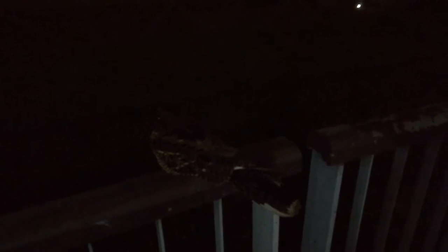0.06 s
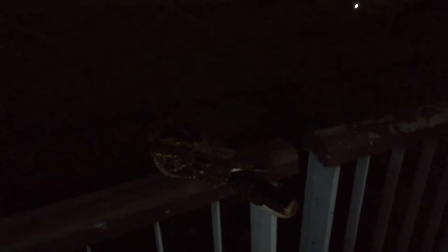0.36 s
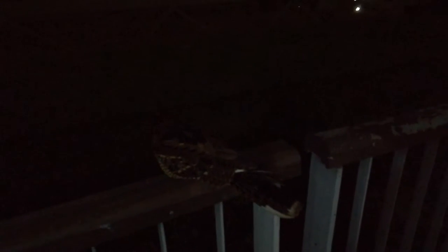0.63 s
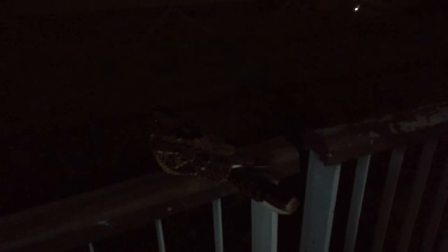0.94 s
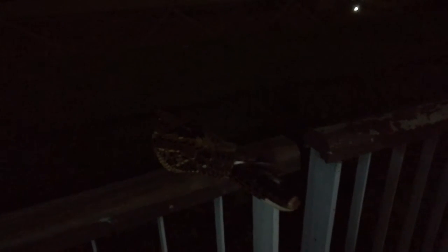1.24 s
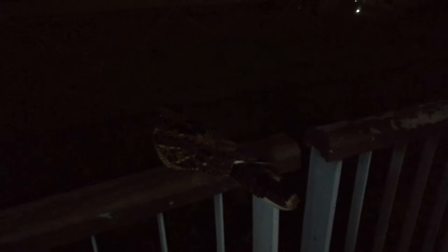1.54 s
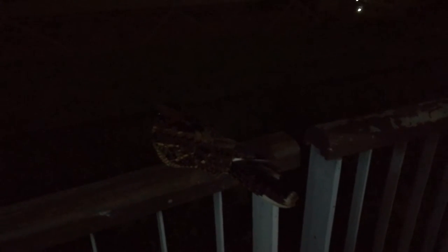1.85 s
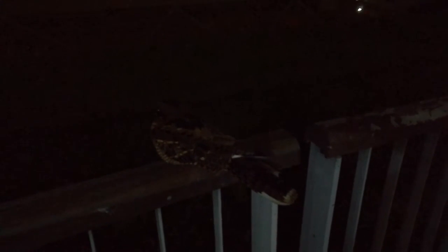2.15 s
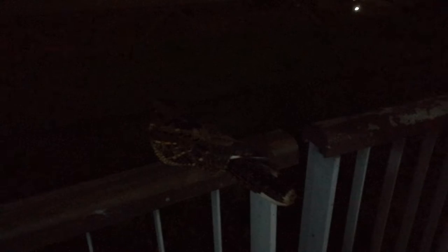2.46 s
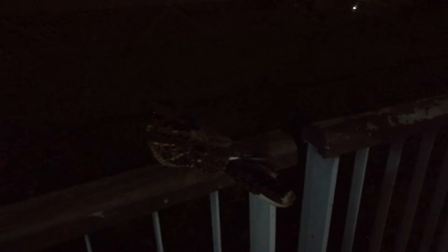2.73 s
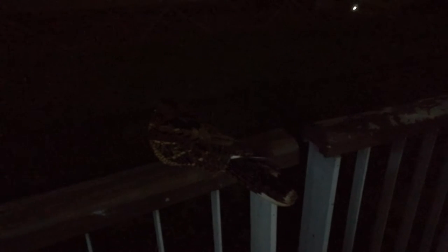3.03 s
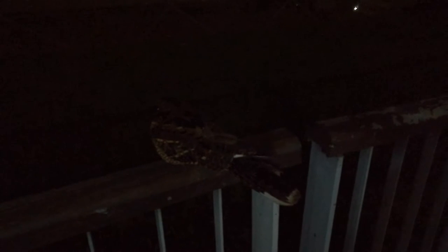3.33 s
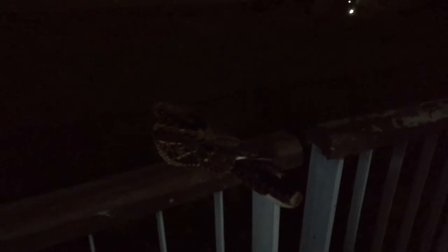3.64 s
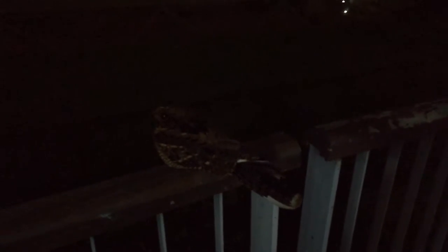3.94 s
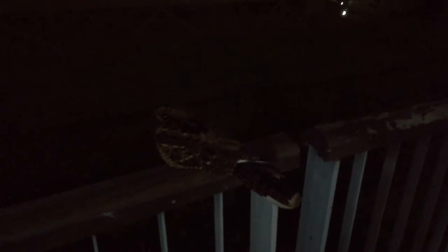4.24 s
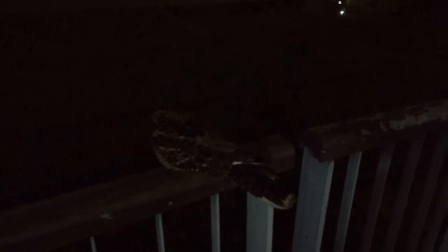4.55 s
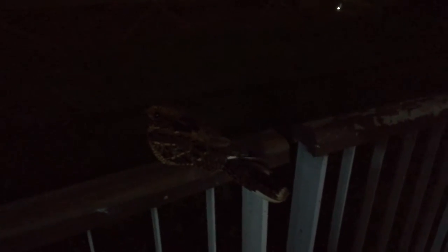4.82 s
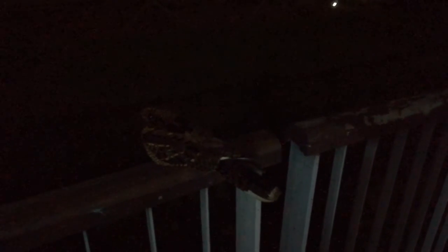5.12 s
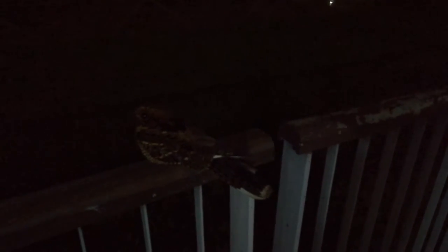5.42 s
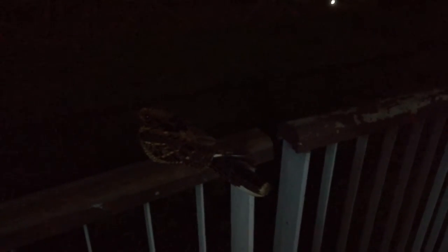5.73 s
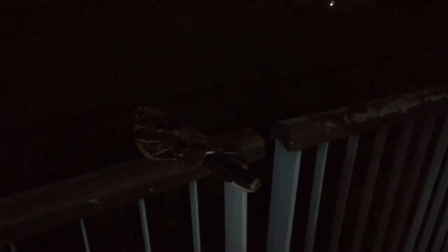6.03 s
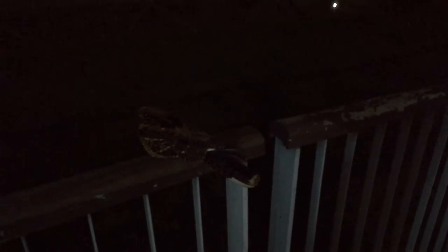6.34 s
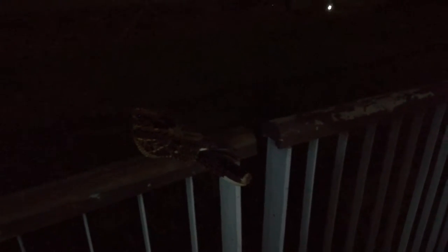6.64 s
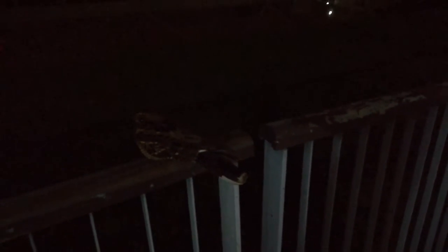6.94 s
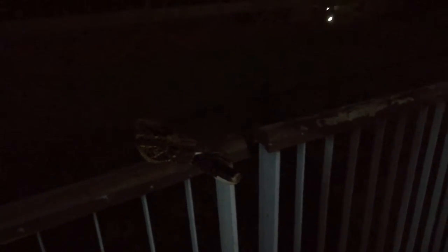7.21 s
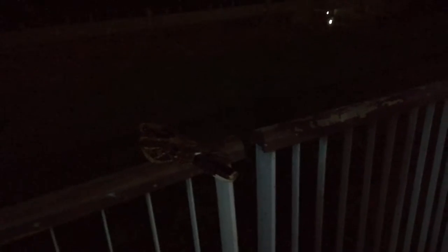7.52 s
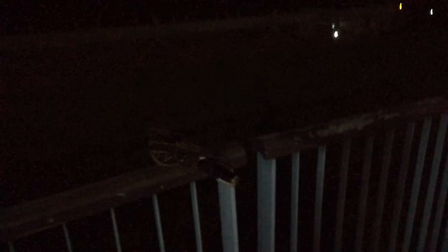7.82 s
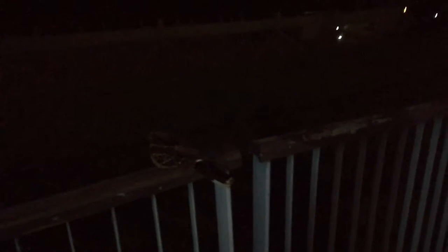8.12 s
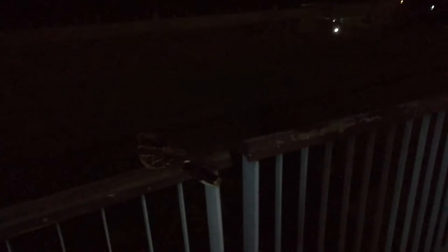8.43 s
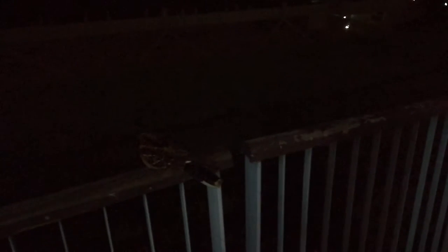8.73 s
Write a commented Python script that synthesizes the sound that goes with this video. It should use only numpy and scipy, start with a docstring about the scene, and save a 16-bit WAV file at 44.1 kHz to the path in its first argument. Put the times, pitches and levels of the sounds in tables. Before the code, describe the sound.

A quiet night outdoors on a porch, heard in wide stereo for about nine seconds. Crickets trill throughout with a fast, even pulse, one close by standing out from a gently swelling chorus. Much higher, thinner insect buzzes come in bouts of about a second, mostly on the right, swelling and breaking off. Softer trills on the left and far insect choirs fill the gaps. An airy hiss and low road rumble lie underneath. A distant truck hums low and slowly rising from the start to about 2 seconds, then again from 3.5 to 4.5. A faint car engine fades gradually, its note sagging just after 5 seconds as the traffic settles slightly. One tiny dry tick sounds nearby at 7.5 seconds and two more at 8. Three very faint, short, far hoots follow between 8.3 and 8.6 seconds while the crickets carry on.

```python
"""Porch at night

Tree crickets trill in the foliage, one close by, each wing stroke a pulse of tone. Ground crickets buzz
high up in bouts that swell and break off; bush crickets and far choirs fill the gaps. Under airy hiss
and road rumble a truck pulls through two gears and a car eases off. Dry ticks and faint hoots end it."""
import sys
import numpy as np
from scipy import signal
from scipy.fft import rfft, irfft, next_fast_len
from scipy.io import wavfile
from scipy.ndimage import uniform_filter1d

SR = 44100
rng = np.random.default_rng(int(sys.argv[2]) if len(sys.argv) > 2 else 0)


def bounce(signal):
    """Save signal as a 16-bit WAV file at the path given by the first command-line argument."""
    frames = np.transpose(np.atleast_2d(signal))
    limited = np.clip(frames, -1, 1)
    pcm = np.round(limited * 32767).astype(np.int16)
    wavfile.write(sys.argv[1], SR, pcm)


N = 386757
TIME = np.arange(N) / SR

# fader ride of the tree cricket chorus: t/s, level/dB
CHORUS_RIDE = [(0.0, -58), (1.15, -57.3), (1.5, -58.5), (2.05, -57.1), (2.8, -58.4), (3.7, -56.5),
               (4.2, -58.5), (4.7, -57), (5.05, -59), (5.5, -57.5), (7.1, -57.5), (8.15, -55), (8.35, -60),
               (8.77, -58)]
# bouts of the nearest ground cricket, which keeps no rhythm: start/s, end/s, final level/dB
FREE_BOUTS = [(1.05, 1.74, -74), (1.9, 2.75, -68.5), (2.95, 3.92, -68), (4.05, 5.21, -64.5),
              (5.45, 6.42, -61.5), (6.72, 7.83, -62), (7.91, 8.8, -64.5)]
# singers that keep a rhythm, by name: first stop/s, stop to stop/s, bout length/s
BOUT_RHYTHMS = {"middle": (.36, 1.115, .92), "high": (.44, .83, .63), "bush": (.95, 1.755, 1.08),
                "far bush": (.14, .97, .45)}
# far insect choirs: f/Hz, pitch spread/Hz, stroke rate/Hz, level/dB, left minus right/dB
FAR_CHOIRS = [(4720, 130, 20, -72.5, 6), (4340, 290, 61, -82.5, 8), (6350, 110, 45, -77.5, 12),
              (6740, 260, 55, -103, 6), (9000, 300, 84, -68.5, -3), (9860, 310, 118, -67, -2.5)]
# tone of the road rumble, the tyre roar and the night air: f/Hz, relative level/dB
RUMBLE_SPECTRUM = [(15, -13), (25, -13), (38, 0), (52, 2.5), (72, -6), (100, -4.5), (135, -13.5),
                   (200, -16), (260, -26.5), (450, -44), (2000, -82)]
TYRE_SPECTRUM = [(130, -6), (220, 0.5), (300, 0.5), (390, 1), (480, -7.5), (700, -19), (2000, -64)]
AIR_SPECTRUM = [(200, -9.5), (500, 2), (1000, 3), (1400, 0.6), (2100, 0.2), (2900, -0.5), (4000, -4.5),
                (5500, -9), (7600, -10.5), (10500, -8), (11600, -17.5), (13500, -16.5), (15600, -19)]
# stereo width of the noise beds: f/Hz, left-right correlation
BED_CORRELATION = [(40, 1), (90, 1), (170, .96), (330, 0.73), (520, -0.28), (750, -0.21), (1300, -0.083),
                   (2500, -0.016), (5000, -0.042)]
# balance of the noise beds: f/Hz, left minus right/dB
BED_BALANCE = [(100, 0), (350, 1), (1000, 0), (2100, -3.5), (3000, -2), (4200, 4), (7000, 1), (12000, -1.4)]
# the truck's pull in each gear: start/s, end/s, starting firing rate/Hz, rise/(Hz/s), level/dB
GEAR_PULLS = [(0, 2.1, 65.03, 5.3, -55), (3.45, 4.55, 52.73, 2.6, -51.5)]
# the car's engine note under power: t/s, f/Hz
CAR_NOTE = [(0.0, 204.1), (0.7, 211.9), (0.88, 197.9), (2.19, 218.6), (5.1, 227)]
# tiny dry ticks: t/s, f/Hz, level/dB
DRY_TICKS = [(7.465, 7800, -50), (7.96, 7700, -51), (7.976, 7500, -46)]
# far hoots: centre t/s, length/s, f/Hz, glide/(Hz/s), level/dB
FAR_HOOTS = [(8.31, .064, 730, 600, -68), (8.55, .047, 725, -1200, -66), (8.62, .058, 655, 600, -66)]

LULL_S, LULL_FADE_S = 5.15, .25  # the traffic settles as the car eases off


def from_db(db):
    """Decibels to gain."""
    return 10 ** (np.asarray(db) / 20)


def unit_rms(x):
    """Scale to unit power."""
    return x / np.sqrt(np.mean(x ** 2) + 1e-20)


def at_time(points):
    """Read an automation curve at every sample."""
    return np.interp(TIME, *np.transpose(points))


def at_hz(points, hz):
    """Read a curve on a log-frequency axis."""
    f, value = np.transpose(points)
    return np.interp(np.log(hz + 1), np.log(f), value)


def pan(side_db):
    """Constant-power left and right gains; positive leans left."""
    return unit_rms(from_db(np.array([[side_db], [-side_db]]) / 2))


def drift(rate_hz):
    """Slow random modulation with a spread near 1."""
    count = int(N / SR * rate_hz) + 3
    return np.interp(TIME * rate_hz + rng.random(), np.arange(count), rng.standard_normal(count))


def foliage(x, wet_db, t60=.22, left_lag_ms=.31, count=3):
    """Direct sound plus the dying scatter off leaves and walls, which shifts as the air stirs."""
    t = TIME[:int(SR * np.clip(t60, .03, .6))]
    tails = rng.standard_normal((count, 2, len(t))) * from_db(-60 * t / t60) * (t > .003)
    tails /= np.sqrt(np.sum(tails ** 2, axis=2, keepdims=True))
    scatter, power = np.zeros((2, N)), 1e-9
    for tail in tails:  # wandering crossfade between reverb tails
        share = drift(3)
        scatter += share * signal.oaconvolve(x[None], tail, axes=1)[:, :N]
        power += share ** 2
    direct = np.array([np.roll(x, round(left_lag_ms * SR / 1000)), x])
    wet = from_db(wet_db)
    return (direct + wet * scatter / np.sqrt(power)) / np.hypot(1, wet)


def stroke_count(stroke_hz, unsteady=.008):
    """Running count of wing strokes for an insect that keeps nearly steady time."""
    return np.cumsum(stroke_hz * (1 + unsteady * drift(4))) / SR + rng.random()


def wings(strokes, pitch_hz, fall, duty, waver=.005, uneven_db=1):
    """Each stroke drags the scraper over the file: a pulse of tone that sinks as the wing slows."""
    stroke = (strokes + .5).astype(int)
    travel = np.clip((strokes - stroke) / duty, -.5, .5)  # the scraper's place along the file
    detune, force = rng.standard_normal((stroke[-1] + 1, 2)).T  # no two strokes are alike
    hz = pitch_hz * (1 + waver * detune[stroke] - fall * travel)
    pulse = from_db(uneven_db * force[stroke]) * np.cos(np.pi * travel)
    return unit_rms(pulse * np.sin(2 * np.pi * np.cumsum(hz) / SR))


def choir(pitch_hz, spread_hz, stroke_hz, fall, duty, wet_db, t60, count):
    """Several insects of one kind, each with its own pitch and pace."""
    pitches = pitch_hz + spread_hz * unit_rms(np.linspace(-1, 1, count))
    voices = sum(wings(stroke_count(stroke_hz * rng.uniform(.93, 1.07)), hz, fall, duty, waver=.012)
                 for hz in pitches)
    return unit_rms(foliage(voices, wet_db, t60, left_lag_ms=.45))


def tree_crickets():
    """One near singer stands out of a chorus of fast and slow trillers, most when the chorus swells."""
    chorus_db = at_time(CHORUS_RIDE)
    near_db = -61.2 + 1.5 * (chorus_db - chorus_db.mean())
    strokes = stroke_count(27.05, unsteady=.012)
    near = wings(strokes, pitch_hz=3380, fall=.11, duty=.52, waver=.006, uneven_db=1.3)
    near = foliage(from_db(near_db) * near, wet_db=-6, left_lag_ms=.3) * pan(-2)
    fast = choir(3403, spread_hz=92, stroke_hz=27, fall=.1204, duty=.61, wet_db=4, t60=.45, count=8)
    slow = choir(3287, spread_hz=80, stroke_hz=20, fall=.1085, duty=.43, wet_db=.5, t60=.35, count=4)
    chorus = from_db(.65) * fast + from_db(-1.1) * slow
    return near + from_db(chorus_db) * chorus * pan(-1)


def regular_bouts(singer, level_db, db_per_s):
    """Evenly spaced bouts on a slow fade up or down: start/s, end/s, final level/dB."""
    first_stop, interval, length = BOUT_RHYTHMS[singer]
    stops = np.arange(first_stop, N / SR + length, interval)
    return [(end - length, end, level_db + db_per_s * end) for end in stops]


def soloist(bouts, pitch_hz, stroke_hz, fall, duty, swell_db, wet_db):
    """The insect presses harder through each bout (softer if the swell is negative), then stops dead."""
    effort = np.zeros(N)
    for start, end, level_db in bouts:
        to_go = (end - TIME) / (end - start)
        singing = (to_go > 0) & (to_go <= 1)
        effort[singing] = from_db(level_db - swell_db * to_go[singing])
    effort = uniform_filter1d(effort, SR // 100)  # 10 ms edges
    song = effort * wings(stroke_count(stroke_hz), pitch_hz, fall, duty)
    return foliage(song, wet_db, t60=.14)


def ground_crickets():
    """Three singers on the right, their strokes so quick that they blur into a buzz."""
    middle_bouts = regular_bouts("middle", level_db=-70, db_per_s=.08)
    high_bouts = regular_bouts("high", level_db=-68.5, db_per_s=-.42)
    low = soloist(FREE_BOUTS, 9080, stroke_hz=84.7, fall=.075, duty=.55, swell_db=7, wet_db=-6)
    middle = soloist(middle_bouts, 9540, stroke_hz=86, fall=.025, duty=.62, swell_db=4, wet_db=-5.5)
    high = soloist(high_bouts, 10160, stroke_hz=125.5, fall=.06, duty=.7, swell_db=4, wet_db=1)
    return (low + middle) * pan(-7.5) + high * pan(-4)


def bush_crickets():
    """Two slow-stroking trillers on the left: one's bouts taper, the other's swell."""
    bouts = regular_bouts("bush", level_db=-78, db_per_s=-.1)
    far_bouts = regular_bouts("far bush", level_db=-75.5, db_per_s=1)
    tapering = soloist(bouts, 4320, stroke_hz=20.3, fall=.0506, duty=.59, swell_db=-2.5, wet_db=13)
    swelling = soloist(far_bouts, 4730, stroke_hz=23, fall=.057, duty=.35, swell_db=6, wet_db=-2)
    return tapering * pan(1) + swelling * pan(5)


def far_insects():
    """A backdrop of unbroken choirs, washed out by the foliage."""
    out = np.zeros((2, N))
    for hz, spread_hz, stroke_hz, level_db, side_db in FAR_CHOIRS:
        voices = choir(hz, spread_hz, stroke_hz, fall=.0726, duty=.57, wet_db=8, t60=.6, count=4)
        out += from_db(level_db) * pan(side_db) * voices
    return out


def noise_bed(spectrum):
    """Coloured stereo noise, mono in the bass and wide in the treble."""
    size = next_fast_len(N)
    hz = np.arange(size // 2 + 1) * SR / size
    mid, side = rfft(rng.standard_normal((2, size)))
    alike = np.clip(at_hz(BED_CORRELATION, hz), -1, 1)
    stereo = np.sqrt(1 + alike) * mid + np.sqrt(1 - alike) * side * [[1], [-1]]
    gain = from_db(at_hz(spectrum, hz) + at_hz(BED_BALANCE, hz) * [[.5], [-.5]])
    return unit_rms(irfft(stereo * gain, size)[:, :N])


def road(lull):
    """Far rumble holds nearly level while the tyre roar drops back in the lull."""
    rumble = from_db(-51.5 + .1 * lull) * noise_bed(RUMBLE_SPECTRUM)
    tyres = from_db(-66.5 - 2.5 * lull) * noise_bed(TYRE_SPECTRUM)
    return rumble + tyres


def engine(hz, overtone_db, waver, fading_db):
    """Only the lowest two tones of an exhaust carry this far, and they fade in and out on the way."""
    phase = 2 * np.pi * np.cumsum(hz * (1 + waver * drift(12))) / SR
    exhaust = np.sin(phase) + from_db(overtone_db) * np.sin(2 * phase)
    return unit_rms(exhaust) * from_db(fading_db * drift(7))


def car(lull):
    """A light engine fades as it drives off, and its note sags when it eases off."""
    hz = at_time(CAR_NOTE) * (1 - .2 * lull)
    level_db = -64.5 - TIME - .5 * lull  # loses 1 dB a second
    return from_db(level_db) * engine(hz, overtone_db=-13.5, waver=.01378, fading_db=3)


def far_engines(lull):
    """Two more engines drone on wandering notes until the lull."""
    drones = sum(engine(hz * (1 + .045 * drift(2)), overtone_db=-17, waver=.0251, fading_db=3.5)
                 for hz in (340, 395))
    return from_db(-76.5) * (1 - lull) * drones


def truck(attack_s=.097, release_s=.34):
    """In each gear the throttle opens, the revs climb steadily, and the note dies away for the shift."""
    out = np.zeros(N)
    for start, end, hz, rise_hz_per_s, level_db in GEAR_PULLS:
        throttle = np.clip((TIME - start) / attack_s, 0, 1)
        throttle *= np.exp(-np.maximum(TIME - end, 0) / release_s)
        firing_hz = hz + rise_hz_per_s * (TIME - start)
        exhaust = engine(firing_hz, overtone_db=-20, waver=.005, fading_db=1.2)
        out += from_db(level_db) * throttle * exhaust
    return out


def night_air():
    """An even, wide hiss behind everything."""
    return from_db(-61.5) * noise_bed(AIR_SPECTRUM)


def ticks(rise_s=.0003):
    """Dry ticks close by: bright pings that die almost at once."""
    out = np.zeros(N)
    for start, hz, level_db in DRY_TICKS:
        age = np.clip(TIME - start, 0, .02)
        envelope = age / rise_s * np.exp(1 - age / rise_s)
        out += from_db(level_db) * envelope * np.sin(2 * np.pi * hz * age)
    return foliage(out, wet_db=-3, t60=.054, count=1)


def hoots():
    """Far hoots: short, soft-edged glides blurred by the trees."""
    out = np.zeros(N)
    for centre, length, hz, glide_hz_per_s, level_db in FAR_HOOTS:
        t = TIME - centre
        envelope = np.exp(-(2 * t / length) ** 2)
        out += from_db(level_db) * envelope * np.sin(2 * np.pi * (hz + glide_hz_per_s * t / 2) * t)
    return foliage(out, wet_db=-8, count=1)


def scene():
    """Insects up front, traffic and air underneath, small details near the end."""
    insects = tree_crickets() + ground_crickets() + bush_crickets() + far_insects()
    lull = np.clip((TIME - LULL_S) / LULL_FADE_S, 0, 1)
    traffic = road(lull) + car(lull) + far_engines(lull) + truck()
    return insects + traffic + night_air() + ticks() + hoots()


def record(dry):
    """A steep high cut at 15.5 kHz on the whole mix."""
    high_cut = signal.ellip(10, .05, 60, 15500, fs=SR, output="sos")
    return signal.sosfiltfilt(high_cut, dry, padtype=None)


dry = scene()
out = record(dry)
bounce(out)
```